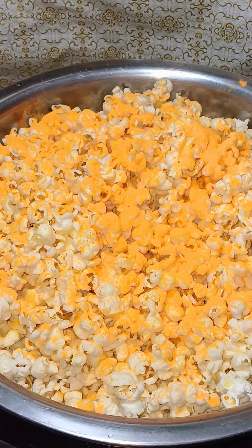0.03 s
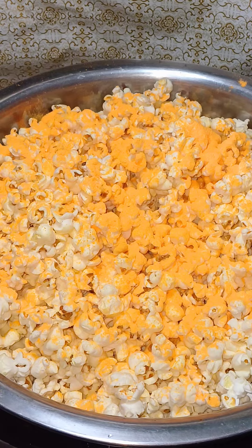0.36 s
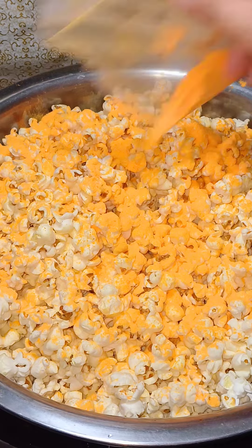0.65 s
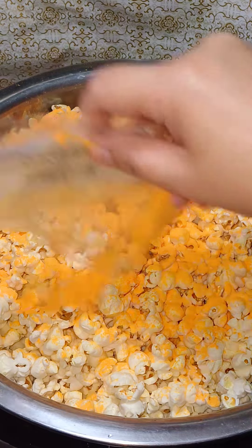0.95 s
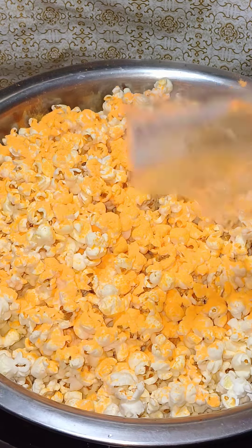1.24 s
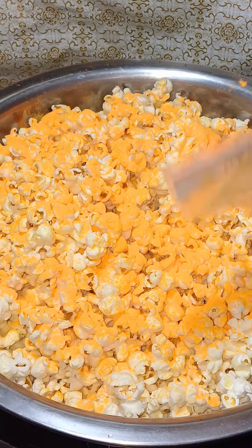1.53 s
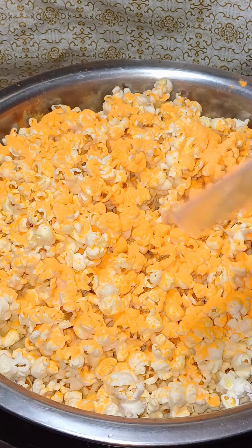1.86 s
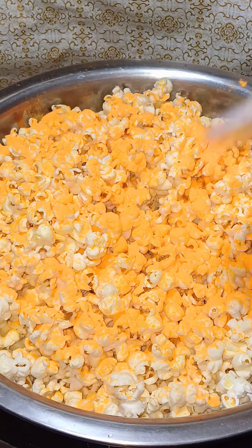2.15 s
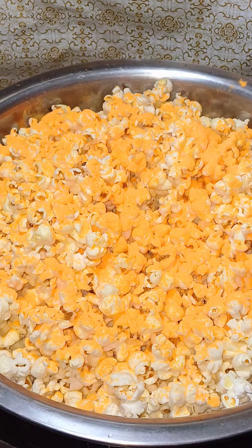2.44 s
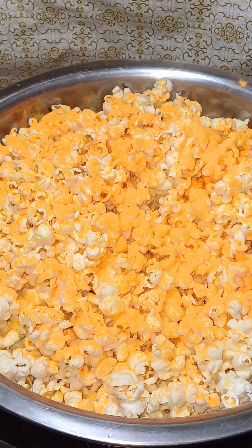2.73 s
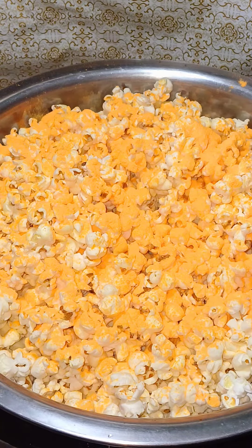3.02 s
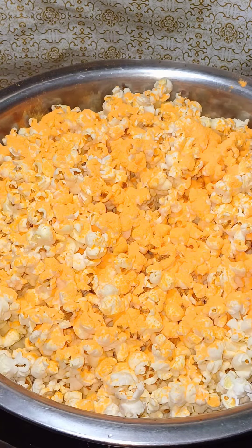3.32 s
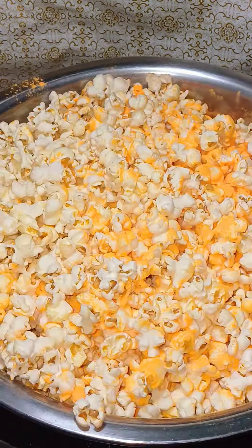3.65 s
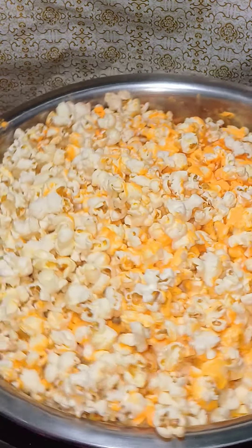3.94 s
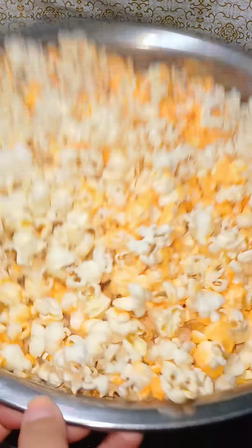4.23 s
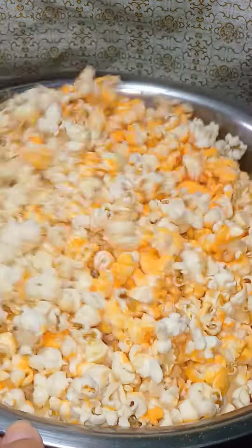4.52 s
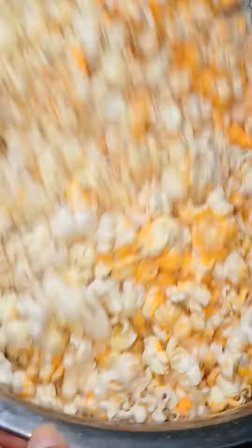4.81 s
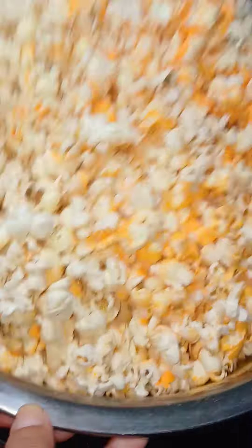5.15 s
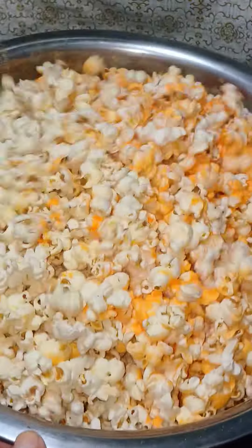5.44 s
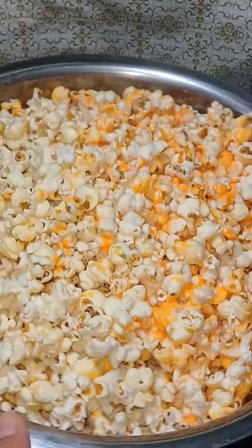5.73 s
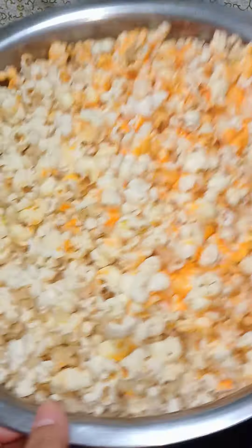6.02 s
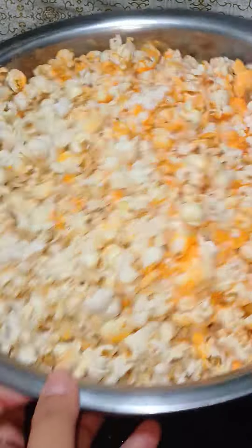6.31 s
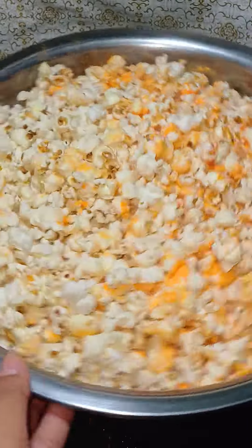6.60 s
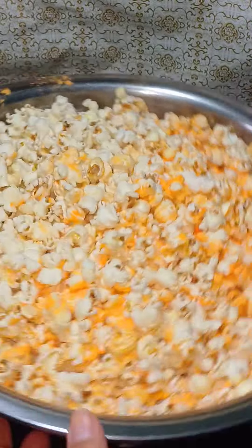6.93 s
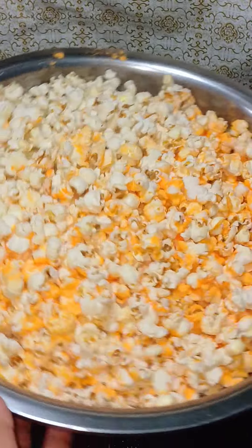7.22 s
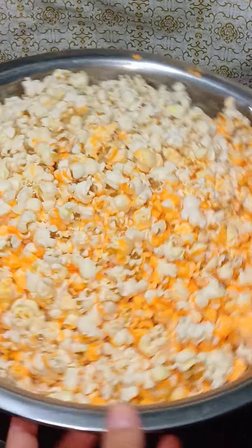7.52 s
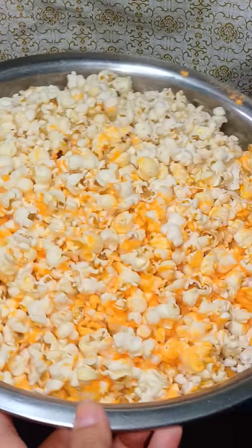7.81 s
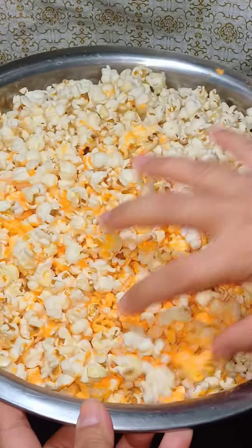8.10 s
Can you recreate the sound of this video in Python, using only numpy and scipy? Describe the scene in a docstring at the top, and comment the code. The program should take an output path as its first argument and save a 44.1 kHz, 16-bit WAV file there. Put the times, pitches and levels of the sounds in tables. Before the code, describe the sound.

Popcorn is tossed three times in a steel bowl with crunchy crashes, amid knocks, rustling and scraping on a table.

```python
"""A small room, close to a big steel bowl of popcorn on a table. Cheese powder is sprinkled in; something
thumps on the table and rocks to rest. The bowl is dragged off with a short stick-slip squeal and tossed
three times, the popcorn crashing back. Then it is bumped, set down and pushed around, and a hand reaches in.
Popcorn and powder are clouds of tiny brittle contacts coloured by the steel; knocks and pushes ring the
table's modes."""
import sys
import numpy as np
from scipy import signal
from scipy.fft import rfft, irfft, next_fast_len
from scipy.io import wavfile
from scipy.ndimage import uniform_filter1d

SR = 44100
rng = np.random.default_rng(int(sys.argv[2]) if len(sys.argv) > 2 else 0)


def wrap_up_sound(samples):
    """Save the sound to the file named by the first command line argument, as 16-bit audio."""
    columns = np.atleast_2d(samples).T
    # keep every value between -1 and 1, then stretch to whole-number steps
    tamed = np.clip(columns, -1, 1)
    steps = np.round(tamed * 32767).astype(np.int16)
    wavfile.write(sys.argv[1], SR, steps)


N = 368676
ROOM_T60_S = 0.39


def from_db(db):
    """Decibels to gain."""
    return 10 ** (np.asarray(db) / 20)


def rms_one(x):
    """Scale to rms 1."""
    return x / np.sqrt(np.mean(x ** 2) + 1e-20)


def evened(x):
    """Hold a pair's mid near rms 1 over 40 ms; finer grain stays."""
    power = uniform_filter1d(x.mean(axis=0) ** 2, SR // 25)
    return x / np.sqrt(np.abs(power) + power.mean() / 1000)


def add(out, s, sound):
    """Mix a sound in at time s."""
    start = round(s * SR)
    out[:, start:start + sound.shape[-1]] += sound[:, :N - start]


def at_hz(points, hz):
    """Read a spectrum on a log-frequency axis."""
    points = np.array(points)
    return np.interp(np.log(hz + 1), np.log(points[:, 0]), points[:, 1])


def colour(x, spectrum, resonances=()):
    """Filter by a smooth spectrum plus resonances."""
    length = x.shape[-1]
    size = next_fast_len(length, True)
    hz = np.arange(size // 2 + 1) * SR / size
    power = 1 + sum((from_db(db) ** 2 - 1) / (1 + (2 * (hz - centre) / width) ** 2)
                    for centre, width, db in resonances)
    gain = from_db(at_hz(spectrum, hz)) * np.sqrt(np.abs(power))
    return irfft(rfft(x, size) * gain, size)[..., :length]


def band(x, low_hz, high_hz):
    """Band-pass."""
    sos = signal.butter(2, [low_hz, min(high_hz, .48 * SR)], "band", fs=SR, output="sos")
    return signal.sosfilt(sos, x + 1e-18)


def ring(x, hz, width_hz):
    """One decaying mode."""
    r, w = np.exp(-np.pi * width_hz / SR), 2 * np.pi * hz / SR
    return signal.lfilter([0, np.sin(w)], [1, -2 * r * np.cos(w), r * r], x)


def fading(x, fall_s, rate_hz):
    """Spread each input over an exponential decay of equal sum."""
    r = np.exp(-1 / (fall_s * rate_hz))
    return signal.lfilter([1 - r], [1, -r], x + 1e-18)


def swell(s, rise_s, length_s, fade_db_per_s):
    """Smooth rise from time s; the fade starts length_s later."""
    t = np.arange(N) / SR - s
    rise = np.sin(np.pi / 2 * np.clip(t / rise_s, 0, 1)) ** 2
    return rise * from_db(-fade_db_per_s * np.clip(t - length_s, 0, 1))


def swells(rows):
    """One gain curve per dB column; overlaps add in power."""
    return np.sqrt(sum(np.outer(from_db(row[4:]), swell(*row[:4])) ** 2 for row in rows))


# stereo spread: (frequency [Hz], side minus mid [dB])
STEREO_SPREAD = [(40, -7.5), (100, -9.5), (250, -8.5), (500, -6.5), (1000, -1), (2500, -1.5), (8000, 1.5)]


def stereo(pair, spectrum, resonances=()):
    """Two unrelated signals to coloured left and right, alike in the bass; mid at rms 1."""
    mid, side = colour(pair, spectrum, resonances)
    side = colour(side, STEREO_SPREAD)
    return np.array([mid + side, mid - side]) / mid.std()


def grains(per_s, spread_db, clump_db, crunch_s, room_db):
    """Random brittle contacts, each with its own size, colour and room tail; two unrelated channels."""
    step = 12  # samples per envelope point
    onsets = np.flatnonzero(rng.random(N) < per_s / SR)
    sizes_db = spread_db * np.minimum(rng.exponential(1, len(onsets)), 4)
    edges_hz = [70, 350, 700, 1200, 1800, 2600, 3700, 5200, 7500, 11000, 17000]
    white = rng.standard_normal((3, N))
    out = np.zeros((2, N))
    for k, (low, high) in enumerate(zip(edges_hz, edges_hz[1:])):
        # contacts in one clump favour the same bands
        favour = np.interp(onsets, np.linspace(0, N, 340), rng.standard_normal(340))
        strengths = from_db(sizes_db + clump_db * favour) * rng.standard_normal(len(onsets))
        energy = np.bincount(onsets // step, strengths ** 2, N // step + 1)
        direct = fading(energy, crunch_s, SR / step)
        tail = from_db(room_db) ** 2 * fading(energy, ROOM_T60_S / (2 * np.log(1000)), SR / step)
        envelope = np.repeat(np.sqrt(direct + tail), step)[:N]
        out += band(white[k % 2:k % 2 + 2] * envelope, low, high)
    return out


def room_tail(t, db):
    """Gain of the room's decay."""
    return from_db(db) * np.exp(-np.log(1000) * t / ROOM_T60_S)


def burst(spectrum, fall_s, room_db, resonances=()):
    """A blow: brief dense vibration, then the room's tail."""
    t = np.arange(SR // 3) / SR
    attack = 1 - np.exp(-t / 0.00026)
    decay = np.hypot(np.exp(-t / fall_s), room_tail(t, room_db))
    return stereo(rng.standard_normal((2, len(t))), spectrum, resonances) * attack * decay


# room noise: (frequency [Hz], level [dB])
ROOM_SPECTRUM = [(15, -38), (25, -11), (69, 4.5), (140, 0), (193, -7.5), (246, -5.5), (495, -16),
                 (1140, -24), (1570, -33), (4870, -24), (6050, -29), (12800, -32.5), (15500, -38.5)]


def room_tone(level_db=-59.5):
    """Steady low noise of the room."""
    return from_db(level_db) * stereo(rng.standard_normal((2, N)), ROOM_SPECTRUM)


# fingers on the rim: (time [s], length [s], pitch [Hz], level [dB])
RIM_RUBS = [(4.635, 0.14, 1504, -56), (5.085, .1, 1456, -63), (5.544, 0.11, 1550, -71),
            (5.678, 0.092, 1230, -57)]


def rim():
    """The rubbed rim sings faintly in one narrow mode."""
    out = np.zeros((2, N))
    for s, length_s, hz, db in RIM_RUBS:
        envelope = np.hanning(round(length_s * SR))
        friction = rng.standard_normal((1, len(envelope)))
        add(out, s, from_db(db) * envelope * rms_one(ring(friction, hz, width_hz=25.5)))
    return out


# powder and its bag: (time [s], rise [s], length [s], fade [dB/s], level [dB])
POWDER_SIFTS = [(0, 0.0034, 1.75, 130, -67), (.33, .02, 0.036, 100, -74), (.64, 0.011, 0.017, 104, -64.5),
                (1.43, 0.022, 0.032, 95.5, -51.5), (1.77, 0.016, .03, 49, -71),
                (2.165, 0.017, 0.018, 130, -60.5), (2.38, .04, .08, 44.5, -69.5),
                (2.58, 0.045, 0.068, 80, -68), (2.81, 0.012, 0.028, 77, -61.5),
                (3.06, 0.073, 0.383, 500, -62.5)]
# powder and bag relative to shifting kernels: (frequency [Hz], gain [dB])
POWDER_COLOUR = [(500, -8.5), (1100, 5), (2800, 2.5), (5000, -4.5), (8000, -1), (13000, 4)]
# kernels shifting: (time [s], rise [s], length [s], fade [dB/s], rustle [dB], hiss [dB])
KERNEL_STIRS = [(3.6, 0.2, 0.28, 120, -46.5, -51.5), (5.6, 0.028, 0.22, 129.5, -62, -64.5),
                (5.99, 0.062, 0.36, 87, -52, -55.5), (6.72, 0.036, 0.13, 105, -74, -63.5),
                (6.93, 0.049, 0.24, 90, -43, -48), (7.28, 0.043, 0.13, 90, -52.5, -58),
                (7.39, 0.01, 0.079, 96, -46, -49.5), (7.5, .04, 0.17, 84, -51.5, -59.5),
                (7.69, 0.083, 0.21, 173, -48.5, -54), (7.99, 0.061, 0.25, 102, -51.5, -52)]
# shifting kernels: (frequency [Hz], level [dB])
STIR_SPECTRUM = [(150, 5), (450, 16), (1200, -0.5), (2500, -2), (3500, 4), (4700, 9), (6200, 1.5),
                 (8500, -2), (11000, -10), (13200, -3.5), (15500, -19)]
# bowl standing on the table: (frequency [Hz], width [Hz], lift [dB])
STANDING_BOWL = [(936, 27, 6.5), (1230, 17, 6), (1490, 110, 3.5), (1730, 16, 6), (2090, 30, 8.5),
                 (2680, 45, 1), (2943, 45, 5.5), (5000, 70, 6), (5570, 98, 4), (8500, 310, -2)]


def rustle():
    """Light contacts: powder sifts, its bag rustles, kernels shift as the bowl tilts or a hand digs in."""
    sift_gain, = swells(POWDER_SIFTS)
    rustle_gain, hiss_gain = swells(KERNEL_STIRS)
    contacts = grains(per_s=550, spread_db=2.5, clump_db=5.0, crunch_s=0.0019, room_db=4.0)
    kernels = stereo(contacts, STIR_SPECTRUM, STANDING_BOWL)
    powder = evened(colour(band(kernels, 700, 24000), POWDER_COLOUR))
    coarse, fine = evened(band(kernels, 400, 5200)), evened(band(kernels, 5800, 16000))
    return sift_gain * powder + rustle_gain * coarse + hiss_gain * fine


def bass_cut(x):
    """Remove the deep bass below 80 Hz."""
    return signal.sosfilt(signal.butter(4, 80, "high", fs=SR, output="sos"), x)


# table under the bowl: (frequency [Hz], width [Hz], level [dB])
TABLE_MODES = [(72, 16, -21), (116.8, 9.1, -10.5), (123.1, 9.3, -1.5), (157, 8.7, -10.5), (210.6, 11, -6.5),
               (217, 16, -9.5), (283, 12.6, -2), (344, 5.3, -14.5), (398, 20, -41), (465, 35, -11)]


def thud(favoured_hz, chatter_s=0.011, chatter_db=4.5, room_db=-5, side_db=-17):
    """An impulse and its chatter ring the table; the contact point favours modes near one pitch."""
    t = np.arange(SR // 3) / SR
    envelope = np.exp(-t / chatter_s) + room_tail(t, room_db)
    out = 0
    for hz, width, db in TABLE_MODES:
        chatter = rms_one(envelope * rng.standard_normal((2, len(t))))
        force = from_db(chatter_db) * chatter / np.sqrt(len(t))
        force[0, 0] += rng.choice([-1, 1])
        favour_db = 6 * np.exp(-(np.log2(hz / favoured_hz) / 0.47) ** 2)
        out = out + from_db(db + favour_db) * np.array([rms_one(ring(f, hz, width)) for f in force])
    mid, side = out[0], from_db(side_db) * out[1]
    return np.array([mid + side, mid - side]) / mid[:SR // 20].std()


# bowl sliding: (time [s], rise [s], length [s], fade [dB/s], judder [dB], scrape [dB])
BOWL_PUSHES = [(3.585, 0.15, 0.32, 135, -42, -42.5), (6.86, 0.056, 0.4, 151, -40.5, -41.5),
               (7.27, 0.028, 0.44, 155, -49, -46.5), (7.68, .06, 0.27, 200, -44.5, -44),
               (8.05, 0.094, .15, 122, -46.5, -52)]
# foot scraping: (frequency [Hz], level [dB])
SCRAPE_SPECTRUM = [(150, -23.5), (330, 4.5), (450, 4), (700, 3.5), (850, 1.5), (1100, -26.5), (2000, -34),
                   (6000, -41)]
# sliding foot: (frequency [Hz], width [Hz], lift [dB])
FOOT_RESONANCES = [(470, 110, 2.5), (524, 27, 7.5), (575, 14, 13.5), (659, 53, 14), (685, 4.8, 11)]


def slides(tilt_db_per_octave=3.3):
    """Tiny slips of the bowl's foot scrape and set the table juddering."""
    judder_gain, scrape_gain = swells(BOWL_PUSHES)
    slips = grains(per_s=700, spread_db=1, clump_db=4.5, crunch_s=0.0023, room_db=-7.5)
    table = 0
    for hz, width, db in TABLE_MODES:
        tilt_db = tilt_db_per_octave * np.log2(hz / TABLE_MODES[0][0])
        table = table + from_db(db + tilt_db) * rms_one(ring(slips[:1], hz, width))
    scrape = stereo(slips, SCRAPE_SPECTRUM, FOOT_RESONANCES)
    return judder_gain * evened(bass_cut(table)) + scrape_gain * evened(scrape)


def squeal(start_s=3.825, steady_hz=628, sharp_hz=12.1, sag_s=.022):
    """The foot sticks and slips in one wavering tone that sags to a steady pitch and dies."""
    t = np.maximum(np.arange(N) / SR - start_s, 0)
    phase = 2 * np.pi * np.cumsum(steady_hz + sharp_hz * np.exp(-t / sag_s)) / SR
    waver = rms_one(band(rng.standard_normal(N), 6.6, 45))
    tone = (1 + .15 * waver) * np.sqrt(2) * np.sin(phase + 0.095 * waver)
    envelope = from_db(-25.5) * swell(start_s, rise_s=0.052, length_s=0.05, fade_db_per_s=170.5)
    pan = from_db([[-5], [2]])
    return envelope * tone * pan


# blows on bowl and table:
# (time [s], thud [dB], clack [dB], rattle [dB], rocking time [s], favoured pitch [Hz])
BOWL_KNOCKS = [(0.928, -52.5, -67, -84.5, .13, 110), (1.274, -23, -26, -26.5, .15, 202),
               (2.714, -58.5, -89, -86, .01, 110), (3.475, -45, -58, -90, .05, 113),
               (3.753, -38, -41.5, -56, .01, 193), (3.839, -39.5, -32, -42.5, .01, 138),
               (3.895, -35, -36.5, -59, .05, 122), (3.975, -40.5, -52, -55, .01, 119),
               (5.606, -34, -39.5, -54, .12, 255), (5.821, -36, -47.5, -61, .01, 116),
               (6.599, -22, -28, -32.5, .12, 167), (6.903, -30, -27.5, -39.5, .01, 222),
               (6.973, -28.5, -47, -41, .01, 130), (6.999, -23.5, -28, -44, .01, 153),
               (7.074, -32.5, -35.5, -46.5, .01, 200), (7.185, -34.5, -33.5, -46, .01, 208),
               (7.287, -29.5, -64, -43.5, .01, 124), (7.413, -31.5, -43, -48, .05, 292),
               (7.511, -23.5, -27, -38.5, .01, 157), (7.594, -35, -41.5, -49, .01, 252),
               (7.997, -39.5, -60, -68, .01, 265), (8.032, -40, -42.5, -56, .01, 130)]
# knocked bowl: (frequency [Hz], level [dB])
CLACK_SPECTRUM = [(80, -9.5), (200, -33), (420, 4.5), (650, 2), (850, -6.5), (1100, -15.5), (1700, -28.5),
                  (3000, -48), (8000, -42)]
# jolted popcorn: (frequency [Hz], level [dB])
RATTLE_SPECTRUM = [(300, -38), (900, 11), (1600, 4.5), (2800, 5), (3700, 3), (5000, 3), (7000, -1),
                   (11000, -6.5), (13000, -3), (15500, -19)]


def knocks(bounce_s=.033, thud_loss_db=4, clack_loss_db=5, rattle_loss_db=9.5):
    """The table thuds, the bowl clacks, popcorn rattles on steel; each bounce is weaker and duller."""
    out = np.zeros((2, N))
    for s, thud_db, clack_db, rattle_db, rocking_s, favoured_hz in BOWL_KNOCKS:
        for k, late_s in enumerate(np.arange(0, rocking_s, bounce_s)):
            table = from_db(thud_db - k * thud_loss_db) * thud(favoured_hz)
            clack = burst(CLACK_SPECTRUM, fall_s=0.024, room_db=-5.5, resonances=STANDING_BOWL)
            clack *= from_db(clack_db - k * clack_loss_db)
            rattle = burst(RATTLE_SPECTRUM, fall_s=0.022, room_db=-3.5, resonances=STANDING_BOWL)
            rattle *= from_db(rattle_db - k * rattle_loss_db)
            add(out, s + late_s, bass_cut(table + clack) + rattle)
    return out


def clumps(per_toss=6, scatter_s=.055, over_crunch_db=-1, centre_hz=3300, spread_octaves=0.63):
    """Clumps land at random around each crash, following its crunch level; rows as in KERNEL_LANDINGS."""
    times = np.repeat([toss[0] for toss in TOSS_CRASHES], per_toss)
    offset, pitch = rng.standard_normal((len(times), 2)).T
    times = times + scatter_s * offset
    crunch_gain = crash(CRASH_STAGES[-1])[(times * SR).astype(int)]
    pitches_hz = centre_hz * 2 ** (spread_octaves * np.clip(pitch, -2, 2))
    return list(zip(times, over_crunch_db + 20 * np.log10(crunch_gain), pitches_hz))


# single kernels and the biggest clumps: (time [s], level [dB], pitch [Hz])
KERNEL_LANDINGS = [(1.275, -26, 5000), (1.461, -45, 4150), (4.32, -33, 1980), (4.394, -17, 2930),
                   (4.456, -24, 5500), (4.506, -32.5, 2437), (4.748, -30.5, 2350), (4.763, -26.5, 3850),
                   (4.819, -17, 2140), (4.966, -39, 3000), (5.060, -43.5, 7100), (5.232, -26.5, 1800),
                   (5.282, -26.5, 4340), (5.321, -22.5, 5850), (5.81, -41, 3220), (6.273, -42, 3030),
                   (6.334, -41, 2180), (6.384, -53, 1800), (6.600, -31, 1640), (6.622, -35.5, 1716),
                   (6.691, -48, 4430), (6.878, -58, 3550), (6.963, -38.5, 3400), (7.058, -44, 4530),
                   (7.119, -40.5, 8040), (7.146, -38.5, 3800), (7.247, -39.5, 2470), (7.408, -40.5, 6050),
                   (7.450, -41, 5000)]
# falling popcorn: (frequency [Hz], level [dB])
POPCORN_SPECTRUM = [(50, -16), (140, -14.5), (300, -15.5), (700, -2.5), (1150, -2), (1500, -2),
                    (2500, -3.5), (3250, -4), (4200, 1.5), (5500, -1), (7000, -7.5), (10000, -11),
                    (13000, -11.5), (15500, -22)]


def landings():
    """A kernel or clump strikes the steel and crunches around its own pitch."""
    out = np.zeros((2, N))
    for s, db, hz in KERNEL_LANDINGS + clumps():
        crunch = burst(POPCORN_SPECTRUM, fall_s=0.014, room_db=-14, resonances=[(hz, 0.15 * hz, 10)])
        add(out, s, from_db(db) * band(crunch, 0.34 * hz, 18000))
    return out


# popcorn hits the bottom: (time [s], level [dB], extra lows [dB], crunch delay [s], stretch [ratio])
TOSS_CRASHES = [(4.366, -.5, 1.5, 0.04, 1.096), (4.774, -.5, 0, 0.06, 1.074), (5.250, -1, 2.5, .04, 1.02)]
# thump on the bottom, boom of the bowl, clatter on steel, crunch on kernels:
# (share of crunch delay [ratio], level [dB], core width [s], skirt [dB], skirt rise [s], skirt fall [s])
CRASH_STAGES = [(0.019, -40.5, 0.032, 1.5, 0.012, 0.081), (.47, -26, 0.03, -11.5, 0.024, 0.08),
                (.7, -20.5, .029, -5.5, .036, .048), (.98, -19.5, .03, -6, .036, .048)]


def crash(stage, heavy=False):
    """Gain of one stage over all tosses: a dense core in a skirt of stragglers."""
    share, level_db, core_s, skirt_db, rise_s, fall_s = stage
    out = 0
    for s, db, lows_db, delay_s, stretch in TOSS_CRASHES:
        t = (np.arange(N) / SR - s - share * delay_s) / stretch
        core = np.exp(-.5 * (t / core_s) ** 2)
        skirt = from_db(skirt_db) * np.exp(np.minimum(t / rise_s, -t / fall_s))
        out = out + from_db(level_db + db + heavy * lows_db) * np.hypot(core, skirt)
    return out


# lifted bowl: (frequency [Hz], width [Hz], lift [dB])
LIFTED_BOWL = [(300.5, 54, 3.5), (997, 56, 9.5), (1368, 45, 5.5), (1623, 30, 9.5), (1996, 49, 14),
               (2065, 35, 7.5), (2170, 28, 8.5), (2397, 18, 13), (2760, 39, 12), (2900, 24, 13),
               (3110, 27, 8.5), (4095, 50, 10.5), (4140, 28, 13), (5070, 45, 11)]
# its lowest strong modes: (frequency [Hz], width [Hz], level [dB])
BOOM_MODES = [(440.5, 22, -10), (471, 18, 0), (510, 13, -7.5)]


def tosses():
    """The falling mass drums on the steel, then settles on itself; harder flow means more contacts."""
    thump_gain, boom_gain = [crash(stage, heavy=True) for stage in CRASH_STAGES[:2]]
    clatter_gain, crunch_gain = [crash(stage) for stage in CRASH_STAGES[2:]]
    per_s = 400 + 2500 * np.sqrt(crunch_gain / crunch_gain.max())
    contacts = grains(per_s, spread_db=5.0, clump_db=7.0, crunch_s=0.0011, room_db=-0.5) / np.sqrt(per_s)
    popcorn = stereo(contacts, POPCORN_SPECTRUM, LIFTED_BOWL)
    modes = sum(from_db(db) * rms_one(ring(contacts[k % 2], hz, width))
                for k, (hz, width, db) in enumerate(BOOM_MODES))
    thump = evened(band(popcorn, 190, 352))
    boom = evened(rms_one(modes) + from_db(-13.5) * evened(band(popcorn, 370, 630)))
    clatter = evened(band(popcorn, 800, 4000))
    crunch = evened(band(popcorn, 3000, 19000))
    return thump_gain * thump + boom_gain * boom + clatter_gain * clatter + crunch_gain * crunch


def scene():
    """Popcorn, bowl and table over the quiet room."""
    return room_tone() + tosses() + landings() + rustle() + knocks() + slides() + squeal() + rim()


# microphone ports: (frequency [Hz], left minus right [dB])
PORT_BALANCE = [(150, -0.5), (300, -2), (480, -5.5), (700, -4.5), (1000, -0.5), (1500, -0.5), (2200, -2.5),
                (2700, -3.5), (4000, -2.5), (5800, 0.5), (6700, -9.5), (8500, -19), (10000, -2),
                (15000, -4.5)]
CUTOFF_HZ = 15800


def record(dry):
    """Each microphone port has its own colour; the top is cut."""
    size = next_fast_len(N, True)
    tilt = from_db(at_hz(PORT_BALANCE, np.arange(size // 2 + 1) * SR / size))
    ports = np.array([tilt, np.ones_like(tilt)]) / np.sqrt((1 + tilt ** 2) / 2)
    heard = irfft(rfft(dry, size) * ports, size)[:, :N]
    return signal.sosfilt(signal.ellip(10, .1, 80, CUTOFF_HZ, fs=SR, output="sos"), heard)


dry = scene()
out = record(dry)
wrap_up_sound(out)
```